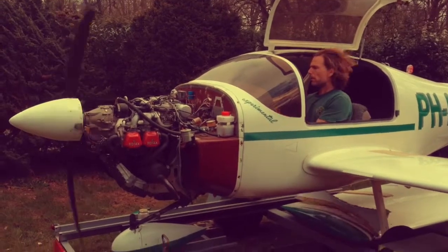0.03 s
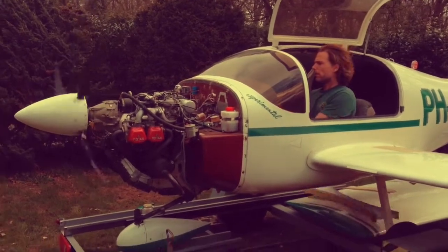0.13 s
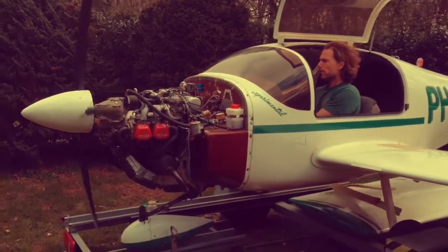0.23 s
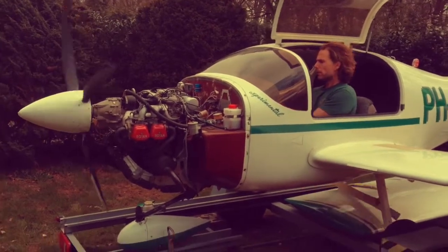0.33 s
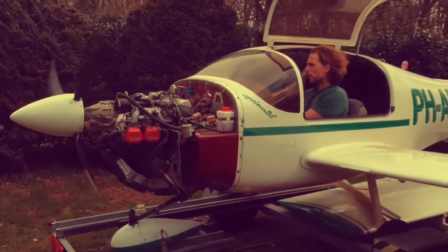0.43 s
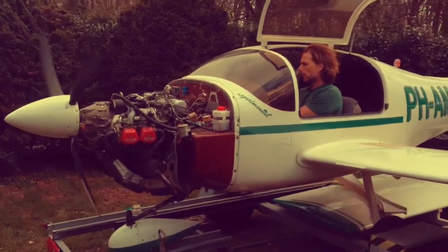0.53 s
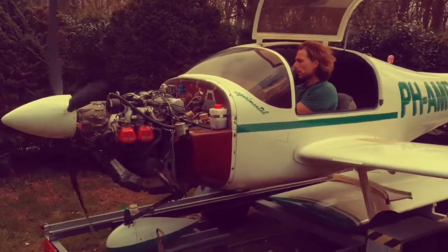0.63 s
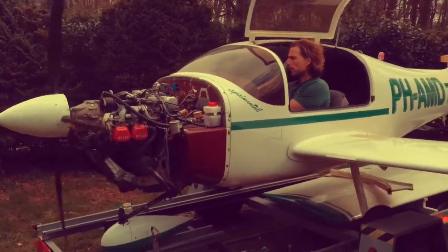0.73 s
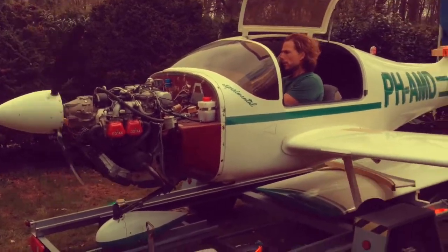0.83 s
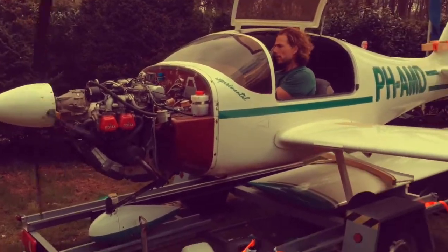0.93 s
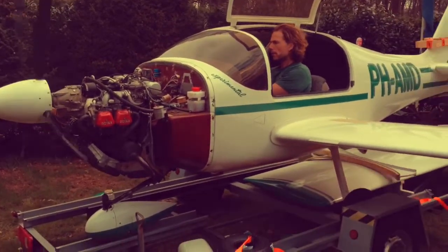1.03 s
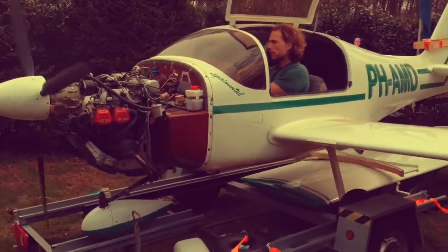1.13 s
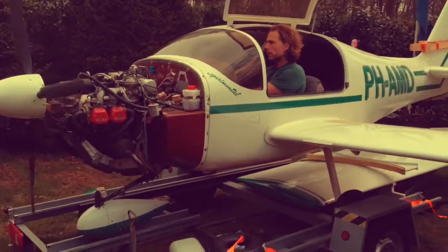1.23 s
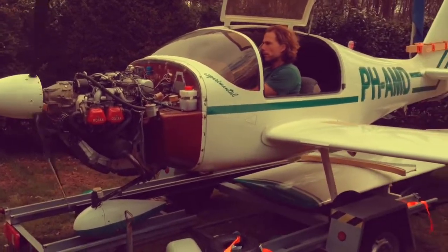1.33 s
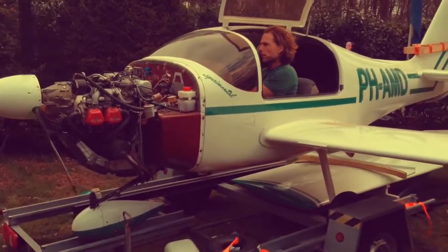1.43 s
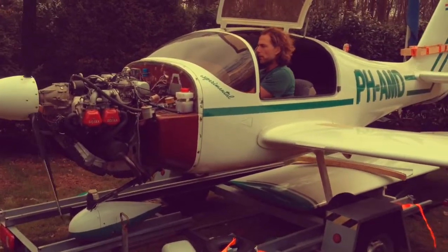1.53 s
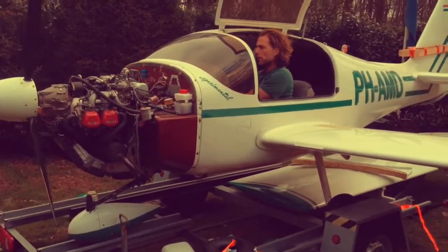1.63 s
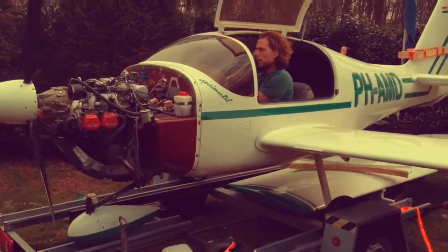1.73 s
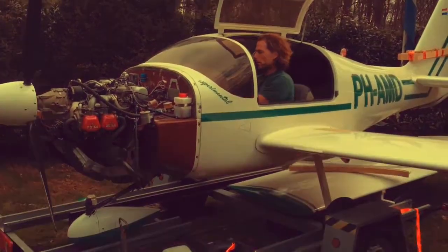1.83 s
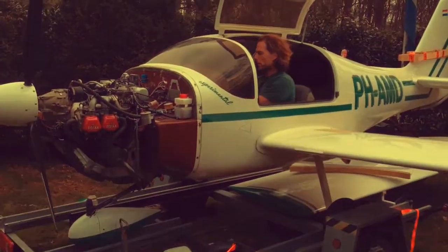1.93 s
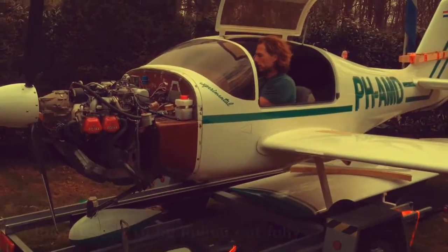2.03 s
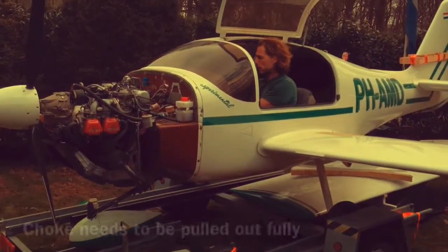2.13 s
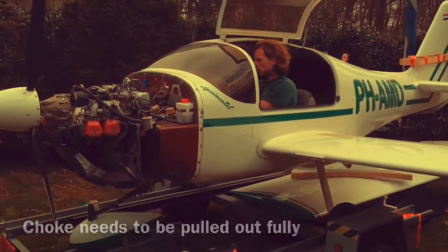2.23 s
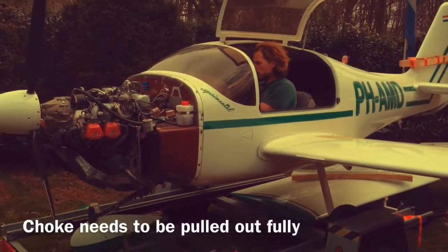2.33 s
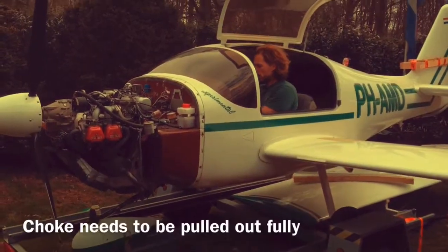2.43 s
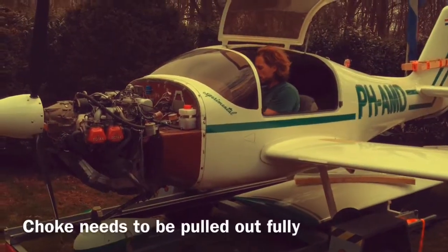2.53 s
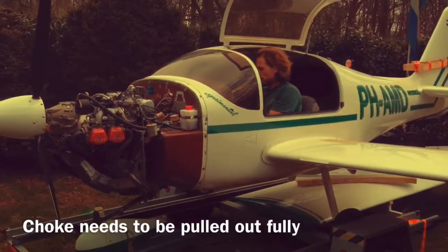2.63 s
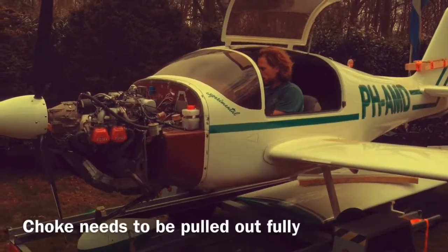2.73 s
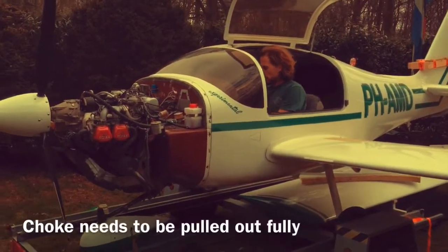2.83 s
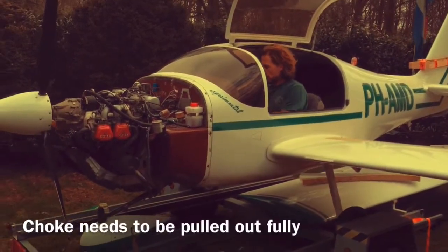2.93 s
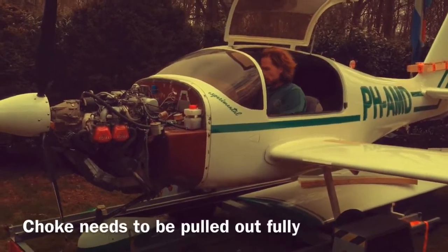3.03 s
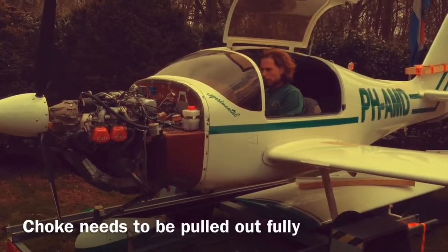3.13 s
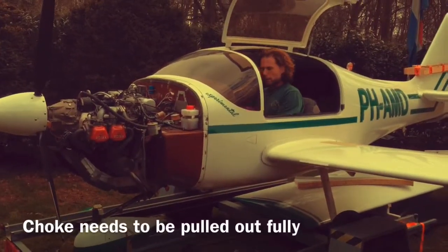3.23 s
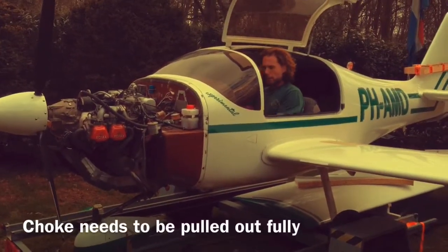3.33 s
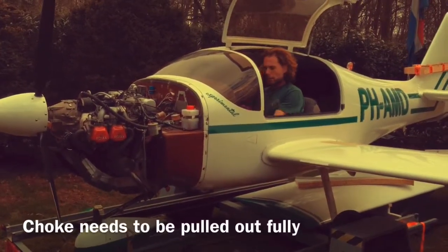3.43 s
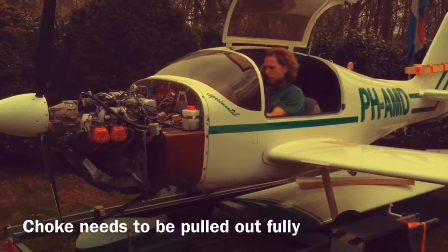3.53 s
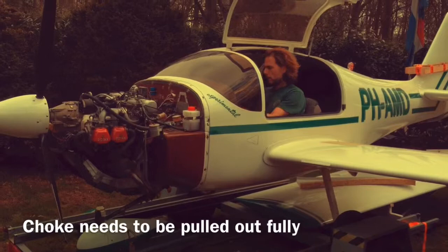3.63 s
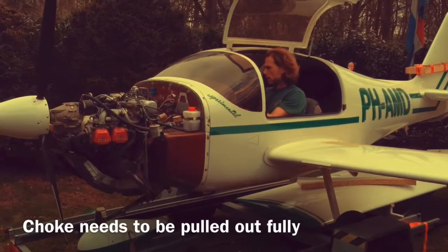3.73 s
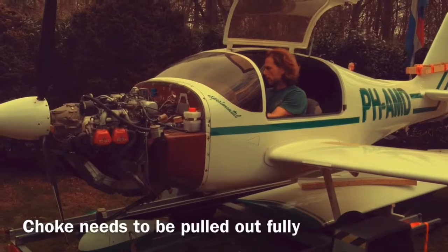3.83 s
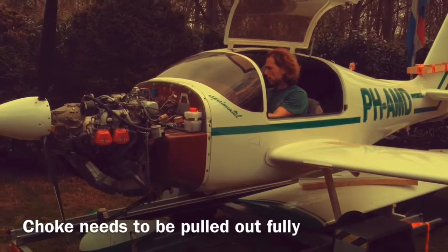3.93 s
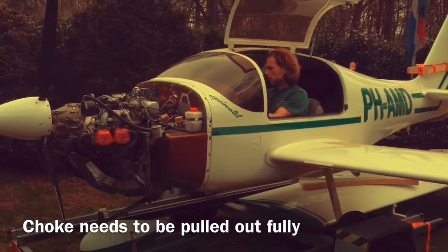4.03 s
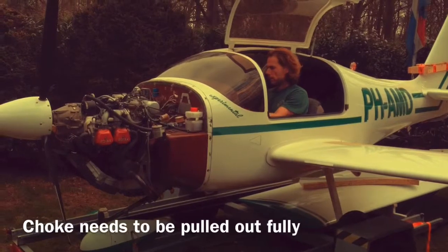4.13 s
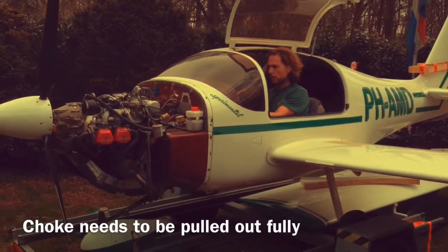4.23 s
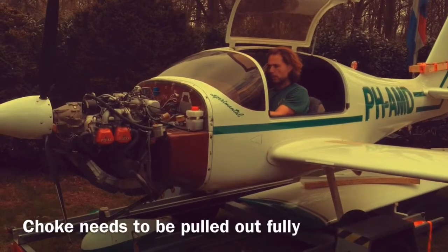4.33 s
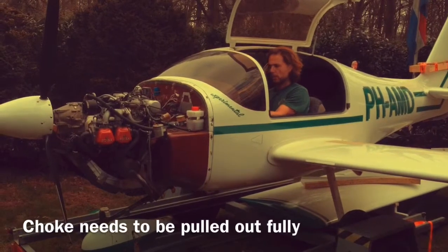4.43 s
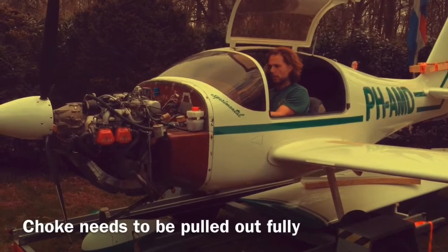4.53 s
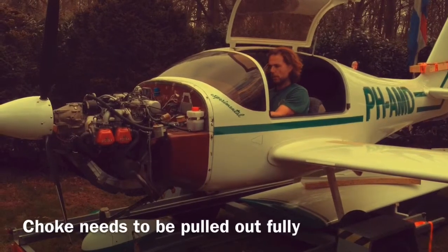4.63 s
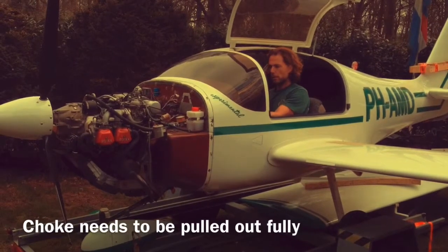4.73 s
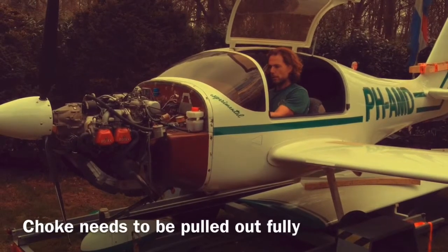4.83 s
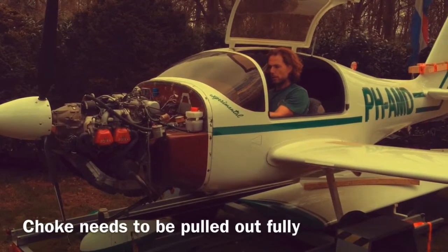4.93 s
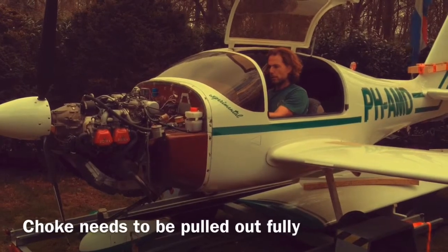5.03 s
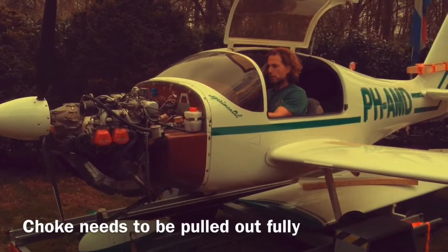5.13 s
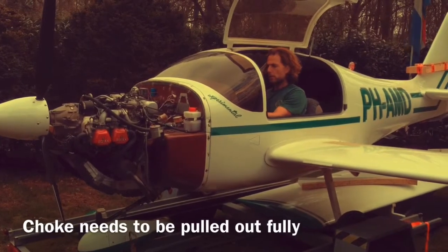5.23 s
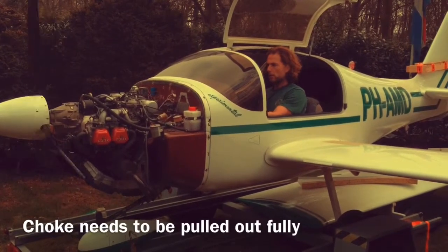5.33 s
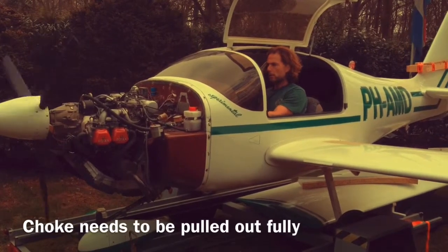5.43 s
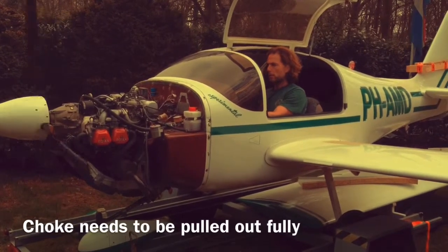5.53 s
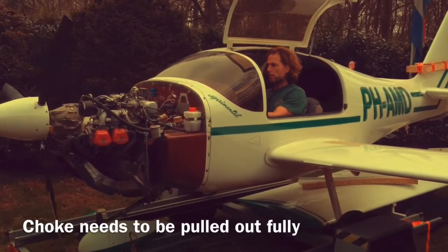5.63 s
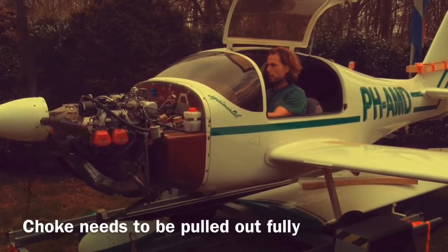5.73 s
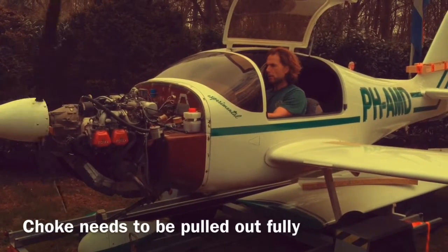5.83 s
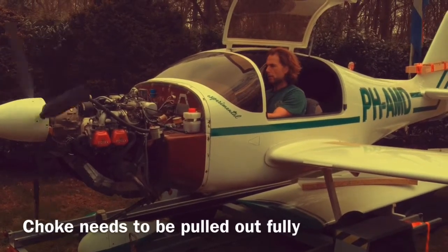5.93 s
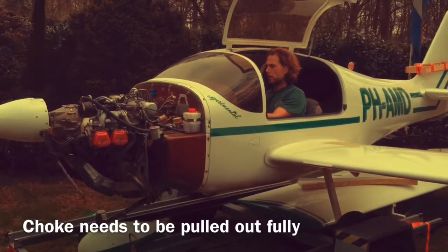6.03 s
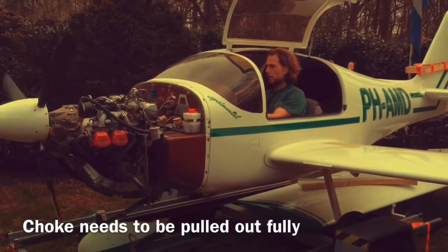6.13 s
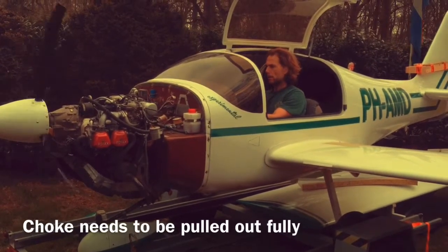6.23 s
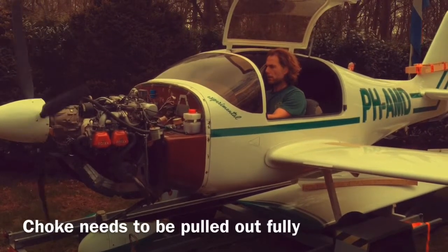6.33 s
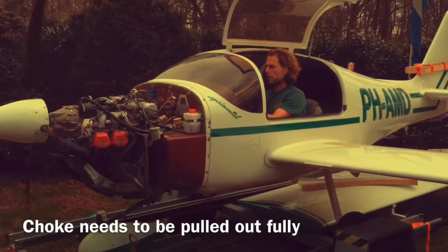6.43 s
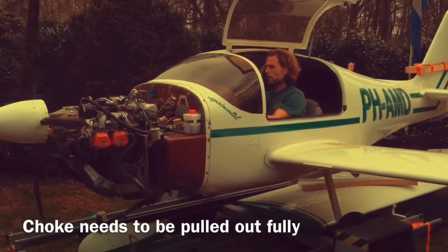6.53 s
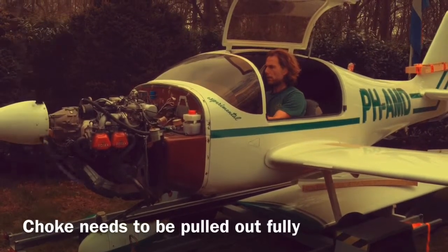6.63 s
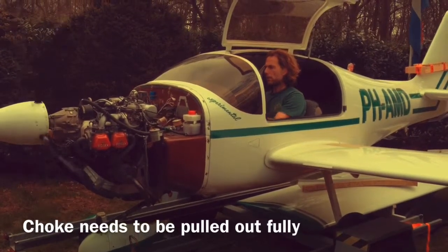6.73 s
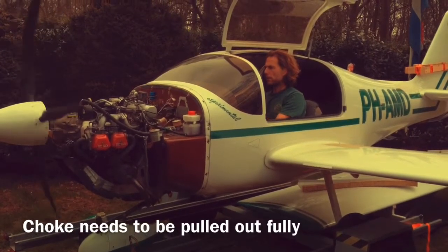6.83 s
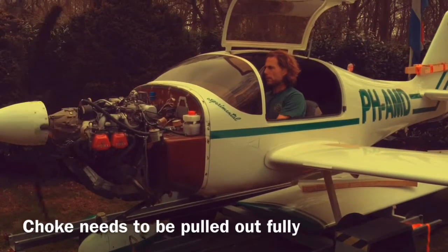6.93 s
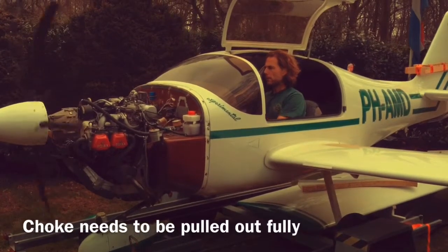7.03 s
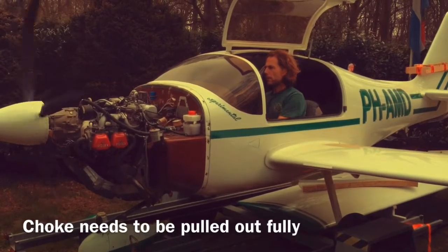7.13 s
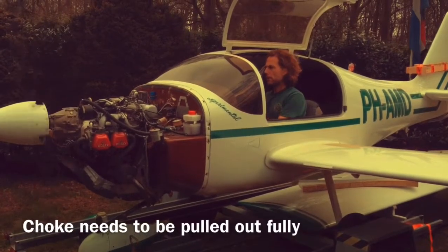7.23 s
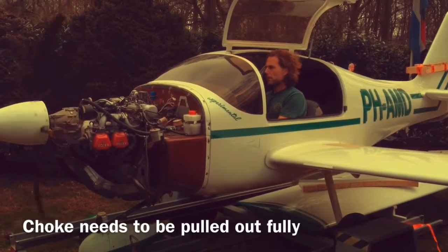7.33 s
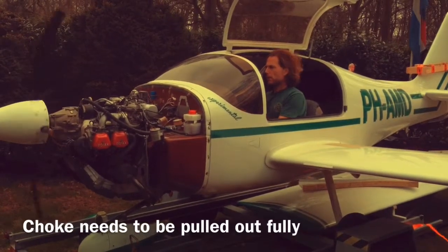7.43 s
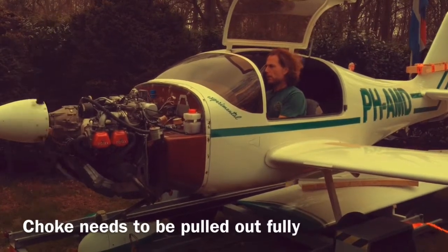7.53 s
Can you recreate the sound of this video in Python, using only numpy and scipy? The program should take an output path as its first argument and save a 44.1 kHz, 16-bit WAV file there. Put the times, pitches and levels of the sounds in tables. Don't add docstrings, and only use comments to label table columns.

```python
import sys
import numpy as np
from scipy import signal
from scipy.fft import rfft, irfft
from scipy.io import wavfile
from scipy.ndimage import uniform_filter1d

SR = 44100
rng = np.random.default_rng(int(sys.argv[2]) if len(sys.argv) > 2 else 0)


def makeup_ratio(level_db):
    decades = np.asarray(level_db, float) / 20
    return 10 ** decades


def int16_out(signal):
    q = np.round(np.clip(np.atleast_2d(signal).T, -1, 1) * 32767)
    wavfile.write(sys.argv[1], SR, q.astype(np.int16))


N = 333837
TIME = np.arange(N) / SR

# (frequency [Hz], density [dB per Hz])
RUMBLE_TONE = [(13, -38), (22, -14), (86, 3.5), (144, -5.5), (206, -4), (260, -3.5), (333, -1), (395, -6.5),
               (500, -8), (650, -24), (1100, -120)]
# (time [s], slam level [dB], ring [Hz], rebound delay [s], rebound level [dB])
SLAMS = [(.3651, -.5, 1600, 0.029, -2.5), (0.4347, -9, 1030, 0.028, -4), (0.5043, -9.5, 1520, 0.029, -6.5),
         (0.5892, -10.5, 1740, 0.033, -8.5), (0.6756, -6, 1800, .0314, -4.5),
         (.7618, -4.5, 1000, 0.033, -6.5), (0.8601, -4.5, 1080, 0.033, -3),
         (.968, -11.5, 1100, 0.031, -3.5), (6.2276, -14, 1990, 0.01, -9.5), (6.286, -7, 1710, 0.023, 0.5),
         (6.4258, -3, 2180, 0.0301, -3), (6.526, -6.5, 1800, 0.027, -6), (6.5973, -6.5, 1770, 0.027, -5),
         (7.03, -16.5, 1970, 0.028, -17.5), (7.4604, -25, 1620, 0.026, -16), (7.529, -7.5, 1880, 0.027, -6)]
# (time [s], slack in the drive [dB], gas flow [dB])
RUN_DOWN = [
    (0, -24, -33),
    (.4, -24, -36),
    (.6, -19.5, -41.5),
    (.98, -22.5, -46.5),
    (1.05, -28, -51),
    (1.4, -26, -51.5),
    (1.53, -40.5, -73),
    (1.96, -58.5, -79),
    (2.5, -68, -80.5),
]
RUN_UP = [
    (6.224, -11, -44.5),
    (6.291, -16.5, -35.5),
    (6.415, -19, -42),
    (6.715, -21.5, -35),
    (6.951, -25, -33),
    (7.25, -22.5, -30),
    (7.57, -24, -35.5),
]


def level(x, db=0):
    return x * makeup_ratio(db) / np.sqrt(np.mean(x ** 2))


def noise():
    return rng.standard_normal(N)


def band(x, lo_hz, hi_hz, order=2):
    return signal.sosfilt(signal.butter(order, [lo_hz, hi_hz], "band", fs=SR, output="sos"), x)


def ring(x, hz, width):
    return signal.lfilter(*signal.iirpeak(hz, hz / width, fs=SR), x)


def colour(x, tone):
    hz, db = np.transpose(tone)
    grid_hz = np.arange(4097) * SR / 8192
    log_gain = np.interp(np.log(grid_hz + 1), np.log(hz), db) * np.log(10) / 20
    ceps = irfft(log_gain)
    ceps[1:4096] *= 2
    ceps[4097:] = 0
    return signal.fftconvolve(x, irfft(np.exp(rfft(ceps))))[:N]


def walk(rate):
    k = int(SR / rate)
    steps = np.repeat(rng.standard_normal(N // k + 1), k)
    return 1.3 * uniform_filter1d(uniform_filter1d(steps, k), k)[:N]


def columns(table):
    s, *cols = np.transpose(table)
    gate = np.clip(np.minimum(TIME - s[0] + .01, s[-1] + .01 - TIME) / .02, 0, 1)
    return [np.interp(TIME, s, c) for c in cols], gate


def burst(s, t60, rise):
    start = int(s * SR)
    t = np.arange(min(int(t60 * SR), N - start)) / SR
    return slice(start, start + len(t)), (1 - np.exp(-t / rise)) * 1000 ** (-t / t60)


def chatter(rate, spread_db):
    hits = rng.random(N) < rate / SR
    size_db = spread_db * np.minimum(rng.exponential(size=N), 5)
    return hits * makeup_ratio(size_db) * np.sign(noise())


def case(x):
    # (frequency [Hz], width [Hz], level [dB])
    case_modes = [(625, 100, -1), (831, 150, 3), (1180, 55, -1.5), (1605, 120, -4.5), (1770, 28, -5),
                  (1930, 20, -1.5), (3240, 156.2, -20)]
    # (frequency [Hz], density [dB per Hz])
    case_tone = [(260, -22), (450, -12.5), (709, -8.5), (809, -5), (1020, -6), (1190, -2.5), (1370, -2.5),
                 (1760, 7.5), (2130, -1), (2700, -15.5), (3610, -12), (4710, -23.5), (6990, -36.5),
                 (11400, -38), (15000, -43.5)]
    modes = level(sum(makeup_ratio(db) * ring(x, hz, width) for hz, width, db in case_modes))
    rung = level(colour(x, case_tone)) + makeup_ratio(-7) * modes
    bands_hz = (450, 1300), (1300, 2700), (2800, 15500)
    return [level(band(rung, lo, hi, order=3)) for lo, hi in bands_hz]


def yard(x):
    t = np.arange(int(.25 * SR)) / SR
    tail = rng.standard_normal(len(t)) * 1000 ** (-t / 0.066) * (t > .006)
    tail = tail / np.sqrt(np.sum(tail ** 2))
    return signal.fftconvolve(band(x, 80, 5000), tail)[:N]


def air():
    # (frequency [Hz], density [dB per Hz])
    air_tone = [(13, -57), (22, -32.5), (40, -11.5), (61, -1), (87, -6), (117, -9), (371, -23), (403, -24),
                (1680, -29), (2600, -35.5), (3240, -30.5), (3620, -32.5), (15500, -39)]
    floor = level(colour(noise(), air_tone), -56.5)
    swell = makeup_ratio(0.69 * walk(2.6))
    return floor + (swell - 1) * band(floor, 25, 400)


def birds():
    # (time [s], length [s], first pitch [Hz], last pitch [Hz], level [dB])
    whistles = [(3.03, .24, 3290, 3230, -72.5), (3.5, .06, 2750, 3200, -73.5),
                (3.55, 0.3, 3240, 3150, -73.5), (3.8, 0.34, 3340, 3400, -76), (4.08, .26, 3210, 3000, -73),
                (4.46, 0.14, 2050, 2400, -70.5), (4.58, .22, 2414, 2450, -74.5),
                (4.82, .2, 1734, 1680, -75.5), (5.09, 0.19, 3350, 2780, -73.5),
                (4.52, .16, 3790, 3900, -75), (3.38, .2, 4200, 4100, -78.5)]
    # (time [s], length [s], first pitch [Hz], last pitch [Hz], level [dB])
    chirps = [(2.449, 0.23, 3600, 3505, -75), (3.899, .12, 3800, 3300, -72.5), (4.0, 0.21, 4200, 4300, -75),
              (4.197, 0.13, 4900, 4390, -68.5), (4.34, 0.064, 3100, 2900, -61.5),
              (3.051, .25, 1610, 1670, -71), (4.518, 0.13, 3800, 3880, -72),
              (4.563, 0.15, 6900, 6080, -71.5), (4.82, .08, 6500, 5800, -69.5),
              (4.92, .07, 5500, 4610, -67), (5.03, .07, 5300, 4510, -67), (5.129, .07, 5200, 4500, -68),
              (5.25, 0.059, 4100, 3470, -63)]
    out = np.zeros(N)
    clear = whistles, 1 + .008 * walk(80), makeup_ratio(2 + 2 * walk(45)), .4
    burry = chirps, 1 + .024 * walk(400), makeup_ratio(3.5 * walk(150)), 1
    for song, trill, flutter, swell in (clear, burry):
        for s, length, first_hz, last_hz, db in song:
            part = np.arange(int(length * SR)) / (length * SR)
            at = slice(int(s * SR), int(s * SR) + len(part))
            hz = (first_hz + (last_hz - first_hz) * part) * trill[at]
            phase = 2 * np.pi * np.cumsum(hz) / SR
            out[at] += makeup_ratio(db) * flutter[at] * np.sin(np.pi * part) ** swell * np.sin(phase)
    return out


def pump():
    start_s, period_s, loaded_s = 1.1037, .0587, .24
    loaded_db, fade_db_per_s, idle_db = -32, 90, -58
    out, hiss = np.zeros(N), noise()
    housing = ring(ring(hiss, 3500, 800), 3500, 800)
    hiss = level(band(hiss, 2800, 5600)) + 2.5 * level(housing)
    for k, vary in enumerate(rng.standard_normal(20)):
        since_s = k * period_s
        at, shape = burst(start_s + since_s, 0.014, 0.00098)
        fading_db = loaded_db - fade_db_per_s * max(since_s - loaded_s, 0)
        out[at] += makeup_ratio(max(fading_db, idle_db) + 2 * vary) * shape * hiss[at]
    return out


def knocks():
    # ((thump [dB], body [dB], edge [dB], t60 [s]), blows of (time [s], peak [dB]))
    struck = [
        ((-5, 1.5, -10, 0.1), [(2.2445, -29.5), (2.257, -34), (2.269, -35)]),
        ((-4.5, -8.5, -18.5, 0.3), [(2.829, -42.5)]),
        ((-18, 1, 13, 0.15), [(5.3172, -26.5)]),
        ((-25, 0, -25, .09), [(5.383, -19)]),
    ]
    hits, out = chatter(4100, 0.8), np.zeros(N)
    edges = (100, 450, 1300, 2700, 15000)
    parts = [level(band(hits, lo, hi, order=3)) for lo, hi in zip(edges, edges[1:])]
    lasting = 2.0, 1.34, 0.66, 0.27
    for (thump_db, body_db, edge_db, t60), blows in struck:
        for s, db in blows:
            for part, gain_db, last in zip(parts, (thump_db, body_db, 0, edge_db), lasting):
                at, shape = burst(s, np.clip(t60, .02, .3) * last, 0.0011)
                blow = shape * part[at]
                out[at] += makeup_ratio(db + gain_db) * blow / np.abs(blow).max()
    return out


def starter():
    # (time [s], whine level [dB], gear mesh after release [Hz])
    strokes = [
        (5.324, -20.5, 950),
        (5.451, -17.5, 990),
        (5.596, -15.5, 990),
        (5.722, -18, 1010),
        (5.823, -16, 1010),
        (5.941, -15.5, 1000),
        (6.043, -16, 990),
        (6.154, -17.5, 1030),
    ]
    # (multiple of mesh rate, level [dB])
    whine_orders = [(1, -7), (2, -9), (4, -23)]
    # (frequency [Hz], width [Hz], level [dB])
    housing = [(915, 140, 5), (1790, 260, 3), (3520, 300, 2)]
    end_s, loaded_hz, spin_up_s = 6.24, 766, 0.097
    s, whine_db, free_hz = np.transpose(strokes)
    sluggish = np.exp(-(s - s[0]) / spin_up_s)
    edges = np.append(s, end_s)
    turn = np.interp(TIME, edges, np.arange(len(edges)))
    k, part = np.minimum(turn.astype(int), len(s) - 1), turn % 1
    on = (TIME > s[0]) & (TIME < end_s)
    drive = on * (makeup_ratio(-5) + np.clip(part / .08, 0, 1) * np.clip((1 - part) / .25, 0, 1))
    race = (1 - np.exp(-part / (0.0204 + .4 * sluggish[k]))) * (1 - part ** 1.3)
    hz = uniform_filter1d(loaded_hz + (free_hz[k] - loaded_hz) * race, size=200)
    phase = 2 * np.pi * np.cumsum(hz * (1 + .022 * walk(130))) / SR
    teeth = sum(makeup_ratio(db + 4 * walk(110)) * np.sin(m * phase) for m, db in whine_orders)
    whine = makeup_ratio(-19) * teeth + sum(makeup_ratio(db) * ring(teeth, f, w) for f, w, db in housing)
    body, clang, edge = case(chatter(3000, 1.2))
    grind_db = uniform_filter1d(whine_db[k] - 7.5, size=600) + 2.07 * walk(60)
    grind = makeup_ratio(grind_db) * (makeup_ratio(-10.0) * body + makeup_ratio(-6.0) * clang + makeup_ratio(-16) * edge)
    sparks = level(band(chatter(8000, 1.5), 4500, 11500, order=2))
    brushes = (k > 0) * makeup_ratio(-51 + 1.5 * walk(50)) * sparks
    load_db = 6.5 * np.exp(-((part - .52) / .12) ** 2)
    mount = makeup_ratio(-41.5 + 2.7 * walk(27)) * level(colour(band(noise(), 22, 360), RUMBLE_TONE))
    return drive * (makeup_ratio(whine_db[k] - 11.0 + load_db) * whine + grind + brushes) + on * mount


def running(throb):
    valve_db, shake_db, push_db = -16.5, -29, 3
    shake_slope, full_slack_db = .9, -22.5
    airframe_lag_s = 0.0695
    body, clang, edge = case(chatter(2500, 0.23))
    valves = level(band(edge, 2000, 7500, order=1))
    intake = level(band(edge, 5200, 17000, order=1))
    rumble = level(colour(band(noise(), 25, 400), RUMBLE_TONE))
    coasting = np.clip(TIME - 1.2, 0, .6) * (TIME < 3)
    wobble_db = (1.8 + 3 * coasting) * walk(45) + 1.5 * throb
    flutter_db = .4 * wobble_db + .8 * walk(60)
    keep = np.exp(-1 / (airframe_lag_s * SR))
    out = 0
    for table in (RUN_DOWN, RUN_UP):
        (rattle_db, hiss_db), gate = columns(table)
        slack_shake = makeup_ratio(shake_db + shake_slope * (rattle_db - full_slack_db))
        shake = gate * (slack_shake + makeup_ratio(hiss_db + push_db))
        shake = signal.lfilter([1 - keep], [1, -keep], shake, zi=[shake[0]])[0]
        rattle = makeup_ratio(rattle_db + wobble_db) * (makeup_ratio(-4.5) * body + makeup_ratio(-3.5) * clang)
        hiss = makeup_ratio(flutter_db) * (makeup_ratio(rattle_db + valve_db) * valves + makeup_ratio(hiss_db) * intake)
        out = out + gate * (rattle + hiss + shake * makeup_ratio(1.6 * walk(12)) * rumble)
    return out


def puffs():
    lead_s, t60_s = 0.0075, .16
    out, hiss = np.zeros(N), level(band(noise(), 5500, 13000, order=1))
    for s, db, *_ in SLAMS:
        at, shape = burst(s - lead_s, t60_s, .008)
        out[at] += makeup_ratio(-32 + 0.13 * db) * shape * hiss[at]
    return out


def firing():
    # (time [s], firing rate [Hz], load level [dB])
    steady = [
        (6.66, 48.7, -37),
        (6.774, 49.5, -23.5),
        (7.066, 63.96, -25),
        (7.202, 68.2, -24),
        (7.272, 70.9, -23.5),
        (7.46, 69.3, -30),
    ]
    # (frequency [Hz], gain [dB])
    exhaust = [(49, -13), (64, 0), (100, 2), (128, 0), (140, -12), (330, -22), (395, -5), (425, -10)]
    (hz, load_db), gate = columns(steady)
    pipe_hz, pipe_db = np.transpose(exhaust)
    first_db, second_db, sixth_db = (load_db + np.interp(m * hz, pipe_hz, pipe_db) for m in (1, 2, 6))
    phase = 2 * np.pi * np.cumsum(hz) / SR
    throb = np.cos(phase / 2)
    lines = makeup_ratio(first_db + 1.2 * walk(25) + 0.91 * throb) * np.sin(phase)
    lines += makeup_ratio(second_db + 2.0 * walk(25) + 2.6 * throb) * np.sin(2 * phase)
    uneven_db = 4 * walk(35) + 6 * np.cos(phase / 4)
    pipe = makeup_ratio(sixth_db + uneven_db) * np.sin(6 * phase + 1.2 * walk(40))
    lines += makeup_ratio(4) * ring(pipe, 420, 90)
    lines += makeup_ratio(first_db - 14 + 4 * throb + 3 * walk(150)) * np.sin(54 * phase + 1.3 * walk(150))
    return np.sqrt(2) * gate * lines, gate * throb


def thuds():
    # (time [s], peak [dB], pitch [Hz])
    lone_firings = [(.004, -12, 111), (.038, -7, 86.5), (.098, -8.5, 80.5), (.154, -8.5, 81),
                    (0.217, -17.5, 70), (0.297, -19, 88.8), (.369, -16, 81.5), (.442, -20, 45.8),
                    (.518, -19, 96.9), (.6, -14.5, 94.2), (0.682, -22, 91.5), (.762, -11, 114),
                    (0.867, -16.5, 99.6), (.967, -27, 94.2), (1.057, -23, 101), (1.269, -27, 150),
                    (1.429, -25.5, 64.6), (6.243, -18, 134), (6.305, -15, 83), (6.381, -18, 102),
                    (6.439, -14, 176), (6.497, -11, 178), (6.548, -9, 182), (6.67, -14, 99),
                    (7.48, -8.5, 74.5), (7.553, -7.5, 80.2)]
    bark_per_flow_db, full_flow_db = 1.2, -30
    late_burn = .6
    out = np.zeros(N)
    times, _, flow_db = np.transpose([*RUN_DOWN, *RUN_UP])
    for s, db, hz in lone_firings:
        flow_bark_db = bark_per_flow_db * (np.interp(s, times, flow_db) - full_flow_db)
        bark_db = -10 + flow_bark_db - late_burn * (db + 13)
        s = max(s - .005, 0)
        at, shape = burst(s, 0.08, 0.0041)
        out[at] += makeup_ratio(db + 4.5) * shape * np.sin(2 * np.pi * hz * (TIME[at] - s))
        at, shape = burst(s + 0.00802, 0.1, 0.0021)
        bark_hz = 385 * (1 + 0.054 * rng.standard_normal())
        out[at] += makeup_ratio(bark_db) * shape * np.sin(2 * np.pi * bark_hz * (TIME[at] - s))
    return out


def clacks():
    # (time [s], peak [dB], ring [Hz])
    taps = [(0.0242, -22.5, 830), (0.132, -18.5, 1690), (.17, -11.5, 1560), (.2354, -22, 1770),
            (.2633, -31, 1660), (0.299, -15, 1660), (.342, -9.5, 1750), (1.069, -22.5, 1770),
            (1.1608, -26, 1930), (1.1987, -25, 770), (1.224, -23.5, 1710), (1.2475, -16.5, 1180),
            (1.3002, -18, 1710), (1.36, -10.5, 870), (1.4089, -13.5, 840), (1.458, -23, 794),
            (1.5484, -34, 799), (1.603, -27, 1170), (1.665, -39, 990), (1.7786, -46.5, 1810),
            (1.8487, -47.5, 700), (1.872, -46.5, 890), (6.3745, -3, 1830), (6.4984, -18, 1690),
            (6.648, -16, 1710), (6.6947, -12, 2040), (6.7401, -15.5, 1800), (6.809, -14.5, 1770),
            (6.86, -18, 1840), (6.8962, -12.5, 1590)]
    # (hollow body [dB], bright edge [dB])
    slam_tone = (-4.5, -14.5)
    # (hollow body [dB], bright edge [dB], ring [Hz])
    rebound_tone = (-6.5, -14, 1780)
    clang_hz = 1750
    tap_body_db, tap_edge_db = -7.5, -15
    hollow_db = 7
    first_contact_db = 6
    envelope, rings = np.zeros((3, N)), np.zeros(N)
    hits = chatter(7000, 0.77)
    blows = []
    for s, db, hz, _, _ in SLAMS:
        blows.append((s, db, slam_tone[0] + 4 * np.log2(clang_hz / hz), slam_tone[1], hz))
    for s, _, _, lag, db in SLAMS:
        blows.append((s + lag, db, *rebound_tone))
    for s, db, hz in taps:
        blows.append((s, db, tap_body_db + hollow_db * np.log2(clang_hz / hz), tap_edge_db, hz))
    hits[[int((blow[0] + .001) * SR) for blow in blows]] = makeup_ratio(first_contact_db)
    for (s, db, body_db, edge_db, hz), vary in zip(blows, rng.standard_normal((len(blows), 3))):
        hz = hz * (1 + .04 * vary[0])
        body_db, edge_db = body_db + 2 * vary[1], edge_db + 2 * vary[2]
        shapes = (body_db, .08, .003), (-1.5, .06, .0025), (edge_db + 0.5, .055, .0007)
        for part, (gain_db, t60, rise) in enumerate(shapes):
            at, shape = burst(s, t60, rise)
            envelope[part, at] += makeup_ratio(db + gain_db) * shape
        at, shape = burst(s, .07, .003)
        rings[at] += makeup_ratio(db - 7.5) * shape * level(ring(hits[at], hz, 110))
    body, clang, edge = case(hits)
    edge = level(band(edge, 2000, 7000, order=2))
    return np.sum(envelope * (body, clang, edge), axis=0) + rings


def scene():
    lines, throb = firing()
    blows = clacks() + thuds() + knocks() + pump() + puffs()
    engine = blows + makeup_ratio(-11.5) * yard(blows) + lines + running(throb) + starter()
    engine = engine - 0.76 * ring(engine, 2760, 210)
    return (engine + birds() + air())[None]


def low_pass(x):
    return signal.sosfilt(signal.butter(12, 16520, fs=SR, output="sos"), x)


def record(dry):
    top = signal.ellip(8, .2, 60, 15330, fs=SR, output="sos")
    mix = signal.sosfilt(top, np.clip(dry, -1, 1))
    return low_pass(mix)


dry = scene()
out = record(dry)
int16_out(out)
```